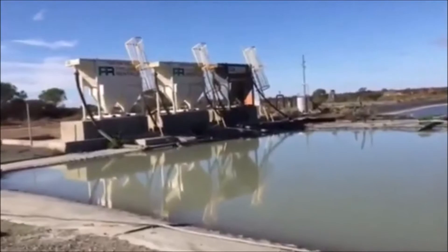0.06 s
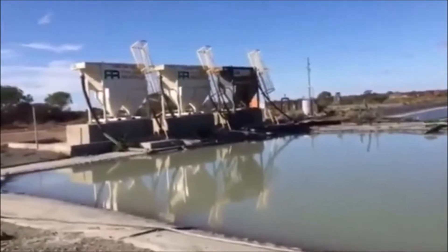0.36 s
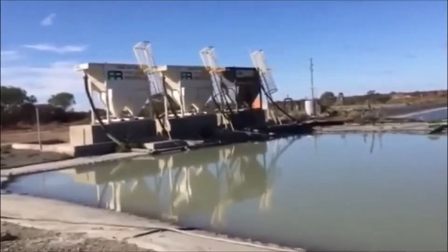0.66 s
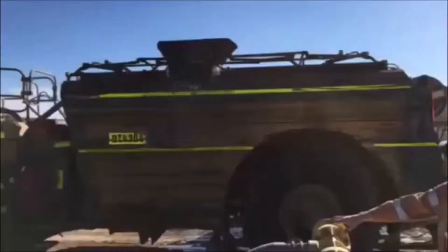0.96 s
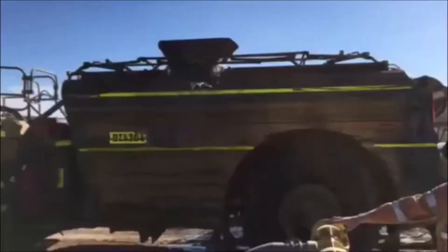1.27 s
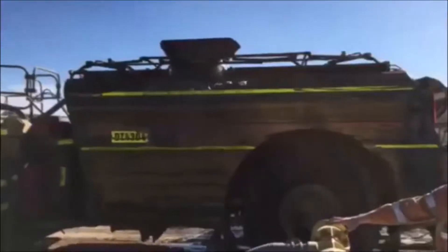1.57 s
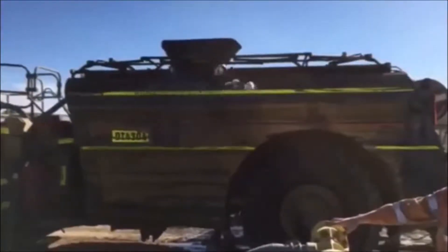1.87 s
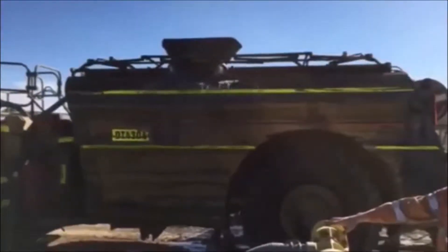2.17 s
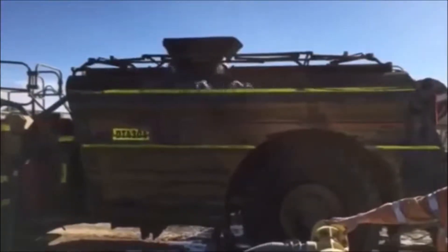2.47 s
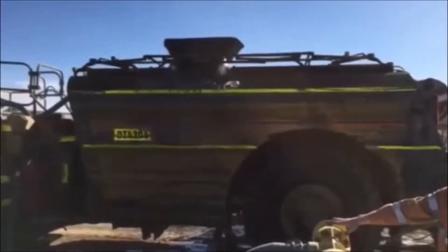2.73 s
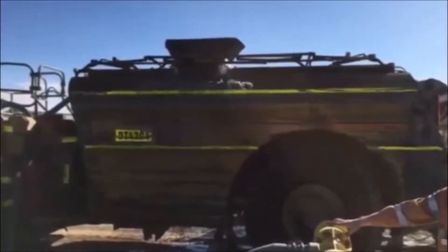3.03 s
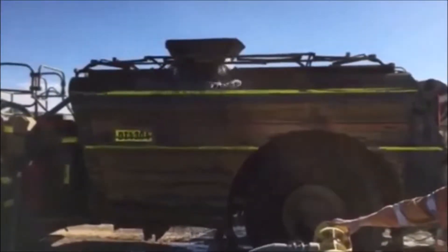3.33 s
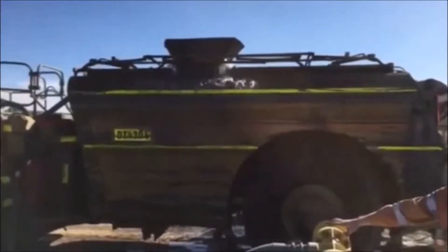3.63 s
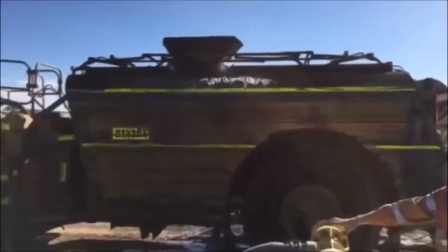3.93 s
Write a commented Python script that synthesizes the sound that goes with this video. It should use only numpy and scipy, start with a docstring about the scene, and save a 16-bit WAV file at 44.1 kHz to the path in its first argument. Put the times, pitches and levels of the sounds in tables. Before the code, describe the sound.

An air-driven pump works outdoors, heard first as a faint, dull rush across a pond. Suddenly close, it hisses and roars through four evenly spaced strokes with knocking valves, while wind buffets the microphone.

```python
"""An air-driven diaphragm pump moves slurry outdoors, while wind buffets the microphone.
For the first second it is heard across a pond: a dull, ringing rush and faint slams.
After a short silence it is close by. Four strokes follow, 0.6 s apart: in each, spent air surges
through the outlet's resonances, then the check valves slam, the hose booms and the slurry sloshes.
Near the end the exhaust dies down and leaves a thinner hiss."""
import sys
import numpy as np
from scipy import signal
from scipy.io import wavfile

SR = 44100
rng = np.random.default_rng(int(sys.argv[2]) if len(sys.argv) > 2 else 0)


def put_to_file(sound):
    """Save the sound as 16-bit audio at rate SR, in the file named by the first command-line argument."""
    columns = np.atleast_2d(sound).T  # one column per channel
    safe = np.clip(columns, -1, 1)
    whole_steps = np.round(safe * 32767)
    wavfile.write(sys.argv[1], SR, whole_steps.astype(np.int16))


N = 176400
TIME = np.arange(N) / SR
FAR_END_S, NEAR_START_S = 1, 1.015


def from_db(db):
    """Amplitude ratio: a factor of ten for every 20 dB."""
    return 10 ** (np.asarray(db) / 20)


def unit_rms(x):
    """Normalisation to a mean power of 1."""
    return x / np.sqrt(np.mean(x ** 2) + 1e-20)


def curve(rows):
    """Linear interpolation between (time_s, value) rows."""
    return np.interp(TIME, *np.transpose(rows))


def envelope(start_s, attack_s, hold_s, decay_s):
    """Exponential damping: a linear rise, and a decay that begins hold_s after the start."""
    age = TIME - start_s
    return np.clip(age / attack_s, 0, 1) * np.exp(-np.maximum(age - hold_s, 0) / decay_s)


def drift(rate_hz):
    """Random modulation: noise low-passed at rate_hz, with an rms of 1."""
    step, settle = 40, 2000
    pole = np.exp(-2 * np.pi * rate_hz * step / SR)
    white = rng.standard_normal(N // step + settle + 2)
    slow = signal.lfilter([1], [1, -2 * pole, pole * pole], white)[settle:]
    return np.interp(np.arange(N) / step, np.arange(len(slow)), unit_rms(slow))


def banded_noise(spectrum, flicker_db, flicker_hz, per_octave=3):
    """Spectral shaping: a sum of noise bands, each flickering on its own; rms 1."""
    hz, db = np.transpose(spectrum)
    edges = 20 * 2 ** (np.arange(10 * per_octave) / per_octave)
    white, out = rng.standard_normal((2, N)), 0
    for k, (low, high) in enumerate(zip(edges, edges[1:])):
        if high > hz[0] and low < hz[-1]:
            band_db = np.interp(np.log(low * high) / 2, np.log(hz), db)
            band = signal.butter(2, [low, high], "band", fs=SR, output="sos")
            out += from_db(band_db + flicker_db * drift(flicker_hz)) * signal.sosfilt(band, white[k % 2])
    return unit_rms(out)


def resonant_noise(modes, drive):
    """Forced resonance: turbulence excites each mode; rms about 1 at a drive of 1."""
    out, power = 0, 0
    for hz, width_hz, db in modes:
        radius = np.exp(-np.pi * width_hz / SR)
        b = np.array([1, 0, -1]) * (1 - radius ** 2) / 2
        a = [1, -2 * radius * np.cos(2 * np.pi * hz / SR), radius ** 2]
        ringing = signal.lfilter(b, a, drive * rng.standard_normal(N) + 1e-18)
        skirts = signal.butter(1, [hz / 2 ** .5, hz * 2 ** .5], "band", fs=SR)
        out += from_db(db) * signal.lfilter(*skirts, ringing)
        power += from_db(db) ** 2 * (1 - radius)
    return out / np.sqrt(power)


# Spectrum of the distant rush: frequency_hz, relative_density_db
FAR_SPECTRUM = [(200, -6), (450, -5.5), (700, -5.5), (1000, -6.5), (1500, -16), (2000, -14.5), (2600, -21),
                (3400, -25), (4400, -25.5), (5500, -31.5), (7000, -33), (10000, -39), (15000, -42)]
# Resonances of the distant machinery: pitch_hz, bandwidth_hz, gain_db
FAR_MODES = [(281, 100, 1.5), (637, 45, 1), (1220, 130, -6), (1730, 57, -7), (3340, 190, -11),
             (5250, 130, -23)]
# Their excitation: time_s, relative_level_db
FAR_LEVEL = [(0.0, -41.5), (0.36, -44), (0.5, -43), (0.87, -46), (0.92, -40.5), (0.98, -38)]

def far_machinery():
    """Noise-driven resonances ring over a dull rush, which follows a share of their swing in level."""
    level_db = curve(FAR_LEVEL)
    rush_db = -48.5 + 0.44 * (level_db - level_db[0])
    rush = from_db(rush_db) * banded_noise(FAR_SPECTRUM, flicker_db=1, flicker_hz=20, per_octave=9)
    return rush + resonant_noise(FAR_MODES, from_db(level_db - 6))


# Spectrum of the wind: frequency_hz, relative_density_db
WIND_SPECTRUM = [(25, -13), (40, -10.5), (60, 2), (90, 1), (140, -1), (200, -8.5), (280, -14.5),
                 (450, -31.5)]
# Wind across the pond and beside the pump: time_s, relative_level_db
FAR_WIND_LEVEL = [(0.0, -34.5), (0.102, -53), (0.308, -39.5), (0.45, -53), (0.558, -41.5), (0.764, -38.5),
                  (0.98, -44)]
NEAR_WIND_LEVEL = [(1.03, -25.5), (1.12, -32), (1.14, -33), (1.34, -22), (1.58, -29.5), (1.67, -20),
                   (1.73, -34), (2.08, -35.5), (2.2, -23.5), (3.06, -28.5), (3.1, -18), (3.35, -28.5),
                   (3.37, -23), (3.66, -29.5), (3.71, -17.5), (3.74, -29), (4.0, -23.5)]
# Single low thumps, mostly wind buffets; those at 1.313 s and 2.502 s are the air valve shifting as a stroke
# begins: centre_s, peak_db, pitch_hz
LOW_THUMPS = [(0.014, -31.5, 112), (0.546, -29.5, 85), (0.61, -25, 84), (0.669, -24, 134), (0.747, -23.5, 72),
              (1.072, -15, 179), (1.115, -17, 102), (1.215, -15, 139), (1.313, -11.5, 82), (1.671, -16, 106),
              (2.241, -15.5, 99), (2.502, -14, 108), (3.383, -23, 92), (3.462, -16.5, 92),
              (3.704, -10.5, 94.5), (3.947, -19, 104)]

def wind():
    """Turbulent pressure on the microphone: a lumpy rumble, with buffets, and the air valve's thumps at two
    stroke starts, as Gaussian wave packets."""
    level_db = np.where(TIME < NEAR_START_S, curve(FAR_WIND_LEVEL), curve(NEAR_WIND_LEVEL)) - 1.5
    lumps_db = 4 * np.tanh(drift(rate_hz=6.1))
    out = from_db(level_db + lumps_db) * banded_noise(WIND_SPECTRUM, flicker_db=0.5, flicker_hz=4.3)
    for centre_s, peak_db, hz in LOW_THUMPS:
        cycles = (TIME - centre_s) * hz
        packet = np.exp(-(cycles / 0.74) ** 2)
        out += from_db(peak_db) * packet * np.cos(2 * np.pi * (cycles + rng.random()))
    return out


def hose_mode(start_s, hz, waver):
    """Frequency modulation: a mode starts sharp, settles, and wavers with the sloshing fill."""
    first, count = int(start_s * SR), SR // 4
    age = np.arange(count) / SR
    settle_s, wavers_per_s = 0.0067, 241
    wander = np.interp(age * wavers_per_s, np.arange(128), rng.standard_normal(128))
    pitch_hz = hz * (1 + 0.064 * np.exp(-age / settle_s) + waver * wander)
    out = np.zeros(N + count)
    out[first:first + count] = np.sin(2 * np.pi * (np.cumsum(pitch_hz) / SR + rng.random()))
    return out[:N]


# Upper modes of the hose: pitch_ratio, gain_db
HOSE_MODES = [(2, 3), (2.55, -5), (3.05, 1.5), (3.55, -1), (4.2, -6.5), (5.35, -2), (6.1, -4), (7.4, -8.5),
              (10.4, -10)]

def clatter(start_s, level_db, pitch_hz, centre_hz):
    """Modal superposition: the valve ball rings the hose's upper modes, most strongly near centre_hz."""
    ratios, mode_db = np.transpose(HOSE_MODES)
    mode_hz = ratios * pitch_hz
    rolloff_db = 6.5 * np.abs(np.log2(mode_hz / centre_hz))
    scatter_db = 4.5 * rng.standard_normal(len(mode_hz))
    gains = from_db(mode_db - rolloff_db + scatter_db)
    gains /= np.linalg.norm(gains)
    rings = sum(gain * hose_mode(start_s, hz, waver=0.019) for hz, gain in zip(mode_hz, gains))
    return from_db(level_db) * envelope(start_s, attack_s=0.0045, hold_s=0.0063, decay_s=0.011) * rings


# Valve slams, far and near: start_s, boom_db, pitch_hz, ring_s, clatter_db, clatter_centre_hz
FAR_SLAMS = [(.272, -27.5, 200, 0.0028, -52, 500), (.352, -27.5, 414.6, 0.01, -43, 1500),
             (.359, -29, 298, 0.021, -39, 1150), (.41, -32, 297, 0.024, -42, 900),
             (.971, -31, 354, 0.013, -34.5, 1900)]
NEAR_SLAMS = [(1.382, -12, 307.7, 0.0089, -5.5, 1230), (1.399, -8.5, 301.6, .02, -28, 900),
              (1.448, -8, 321, 0.0067, -21, 700), (1.978, -17.5, 295.5, 0.012, -7, 700),
              (1.987, -12, 246.6, 0.013, -19, 550), (2.011, -10, 262, 0.0093, -35, 900),
              (2.038, -15.5, 273, 0.031, -22.5, 700), (2.574, -10, 305, 0.0068, -9, 1120),
              (2.587, -11.5, 311, 0.02, -12, 600), (2.639, -12, 312, .02, -24.5, 700),
              (3.176, -25, 311.6, .006, -8, 1050), (3.186, -6, 266, 0.0084, -32, 750),
              (3.208, -15, 309, 0.031, -25, 1100), (3.253, -15.5, 287, .01, -34, 1400)]
# Spectrum of the sloshing slurry: frequency_hz, relative_density_db
SLOSH_SPECTRUM = [(190, -5.5), (260, 6.5), (380, -9.5), (490, -15.5), (750, -8), (1800, -14), (5000, -30.5)]

def valve_slams(rows):
    """Impact excitation: the hose booms in its lowest mode and clatters above it; the slurry sloshes."""
    attack_s, hold_s = 0.0021, 0.0066
    hose, stir = 0, 0
    for start_s, boom_db, hz, ring_s, clatter_db, centre_hz in rows:
        boom = envelope(start_s, attack_s, hold_s, ring_s) * hose_mode(start_s, hz, waver=0.14)
        hose += from_db(boom_db) * boom + clatter(start_s, clatter_db, hz, centre_hz)
        strength = from_db(boom_db) + from_db(clatter_db)
        stir += strength * envelope(start_s, attack_s, hold_s, decay_s=0.03)
    slosh_db = -17 + 4.5 * np.tanh(drift(rate_hz=103))
    slosh = from_db(slosh_db) * banded_noise(SLOSH_SPECTRUM, flicker_db=2, flicker_hz=41)
    return hose + stir * slosh


# Exhaust between surges: time_s, level_db
ROAR_LEVEL = [(1.02, -22.5), (1.6, -25), (2.25, -23), (2.8, -23.5), (3.02, -26.5), (3.3, -24),
              (3.45, -24.5), (3.6, -28), (3.72, -34), (4, -37)]
# Resonances of the exhaust: pitch_hz, bandwidth_hz, gain_db
ROAR_MODES = [(941, 106, -1.5), (1141, 18, -1), (1365, 91, -0.5), (1455, 35, 5), (1521, 46, 3.5),
              (1683, 34, 1.5), (1791, 79, 3.5), (2252, 70, -3.5), (2565, 53, -8), (3610, 34, -3),
              (3774, 70, -4.5), (4160, 220, -5), (4470, 120, -4), (4716, 67, -2), (5077, 45, -1.5),
              (5250, 57, -8.5)]
# Spectrum of its broad rush: frequency_hz, relative_density_db
RUSH_SPECTRUM = [(200, 12.5), (500, 13.5), (750, 12), (1000, 6), (1900, -22), (2900, 10), (4300, -16),
                 (6000, -12.5), (9000, -32)]

def exhaust_roar(swing_db):
    """Flow excitation: spent air drives the outlet's resonances over a broad rush."""
    flow = from_db(curve(ROAR_LEVEL) + swing_db)
    ringing = resonant_noise(ROAR_MODES, flow)
    rush = from_db(-12) * banded_noise(RUSH_SPECTRUM, flicker_db=4, flicker_hz=4.6)
    return ringing + flow * rush


# Spectrum of the fine hiss: frequency_hz, relative_density_db
HISS_SPECTRUM = [(250, 4.5), (500, -4), (900, -5.5), (1500, 3), (2200, 4), (3000, 0.5), (4300, 1.5),
                 (6000, 3.5), (7700, -2.5), (8900, 0), (10400, -2), (11500, -2), (13000, -4.5),
                 (15000, -14)]
# Hiss between surges: time_s, level_db
HISS_LEVEL = [(1.02, -30.5), (1.28, -31), (1.34, -28), (2.3, -28), (2.8, -27), (3.7, -29), (3.82, -28),
              (4, -27.5)]

def air_hiss(swing_db):
    """Jet noise: escaping air makes a broadband hiss, with one narrow notch in the treble."""
    notch_hz, width_hz = 10400, 290
    noise = banded_noise(HISS_SPECTRUM, flicker_db=2, flicker_hz=25, per_octave=15)
    hiss = from_db(curve(HISS_LEVEL) + swing_db) * noise
    return signal.lfilter(*signal.iirnotch(notch_hz, notch_hz / width_hz, fs=SR), hiss)


# High and near-whistling resonances of the outlet: pitch_hz, bandwidth_hz, gain_db
SIZZLE_MODES = [(8980, 260, -9), (11800, 200, -2), (12700, 220, 3.5), (13300, 290, 5), (14440, 600, 2)]
WHISTLE_MODES = [(4115, 36, 0), (4232, 29, -3)]
# Each set between surges: time_s, level_db
SIZZLE_LEVEL = [(1.02, -37), (1.28, -39), (1.34, -33.5), (3.2, -36.5), (3.5, -35.5), (3.7, -47), (4, -39)]
WHISTLE_LEVEL = [(1.02, -31), (1.9, -31), (2.8, -32.5), (2.95, -30), (3.38, -29.5), (3.58, -27.5),
                 (3.72, -39), (4, -43)]

def outlet_ringing(swing_db):
    """Bandwidth sets tonality: the wide, high resonances sizzle and the narrow pair nearly whistles."""
    sizzle = resonant_noise(SIZZLE_MODES, from_db(curve(SIZZLE_LEVEL) + swing_db))
    whistle = resonant_noise(WHISTLE_MODES, from_db(curve(WHISTLE_LEVEL) + swing_db))
    return sizzle + whistle


# Strokes, when the air valve shifts: start_s, surge_db
STROKES = [(1.294, 4), (1.894, 5.5), (2.497, 3.5), (3.095, 6.5)]

def exhaust():
    """Amplitude modulation: the air flutters and surges at each stroke, swinging the roar most."""
    surge_db = sum(db * envelope(start_s, attack_s=0.006, hold_s=0.048, decay_s=0.065)
                   for start_s, db in STROKES)
    swing_db = surge_db + 1.46 * drift(rate_hz=15.5)
    treble_swing_db = 0.57 * swing_db
    return exhaust_roar(swing_db) + air_hiss(treble_swing_db) + outlet_ringing(treble_swing_db)


def scene():
    """Superposition of pump and wind: from afar, then, after a short silence, from close by."""
    far_fade = np.clip((FAR_END_S - TIME) / 0.0016, 0, 1)
    near_fade = np.clip((TIME - NEAR_START_S) / 0.011, 0, 1) ** 2
    gusts = wind()
    far = far_machinery() + valve_slams(FAR_SLAMS) + gusts
    near = exhaust() + valve_slams(NEAR_SLAMS) + gusts
    return (far_fade * far + near_fade * near)[None]


def record(dry):
    """Soft saturation rounds the highest peaks; a steep low-pass limits the bandwidth."""
    ceiling, cutoff_hz = 0.92, 14950
    rounded = dry / (1 + (dry / ceiling) ** 6) ** (1 / 6)
    return signal.sosfilt(signal.ellip(12, .2, 80, cutoff_hz, fs=SR, output="sos"), rounded)


dry = scene()
out = record(dry)
put_to_file(out)
```